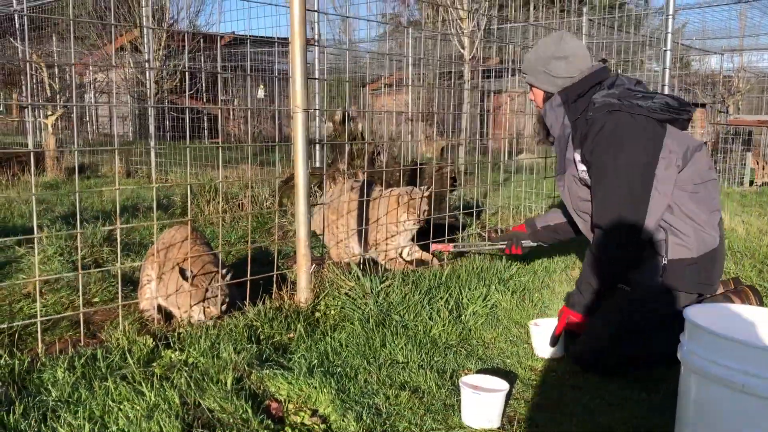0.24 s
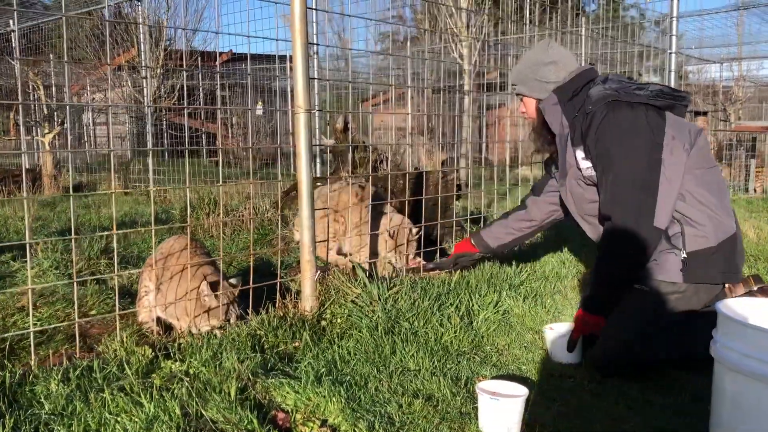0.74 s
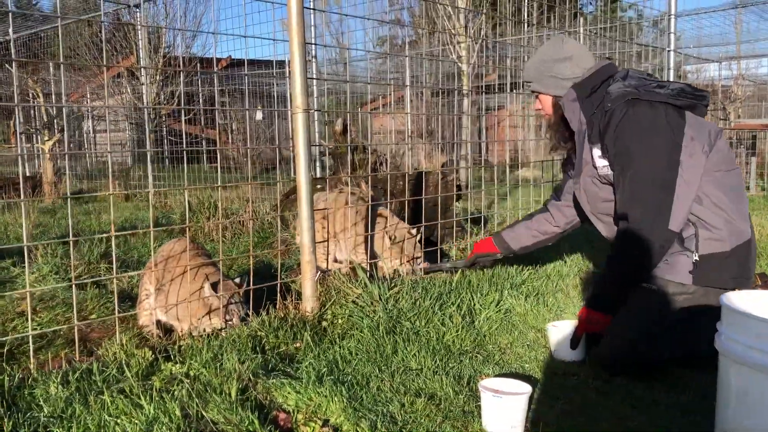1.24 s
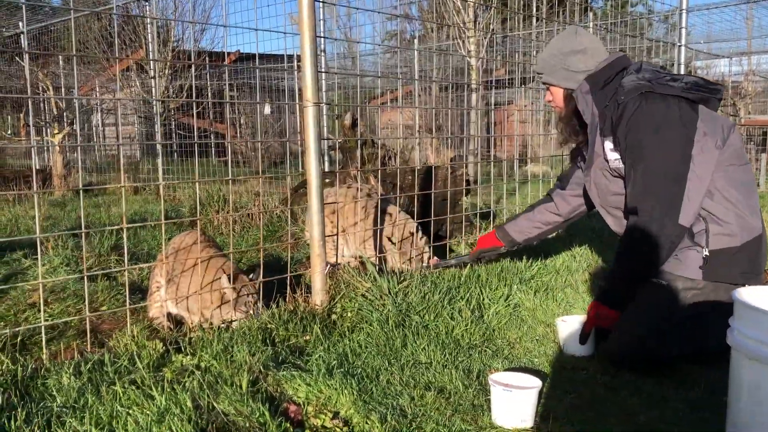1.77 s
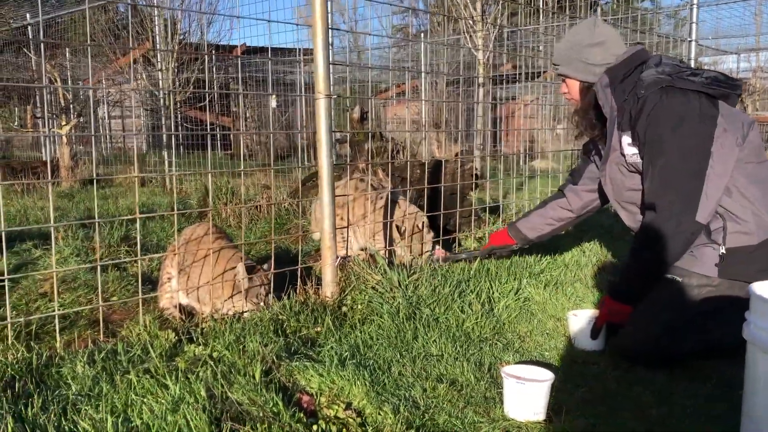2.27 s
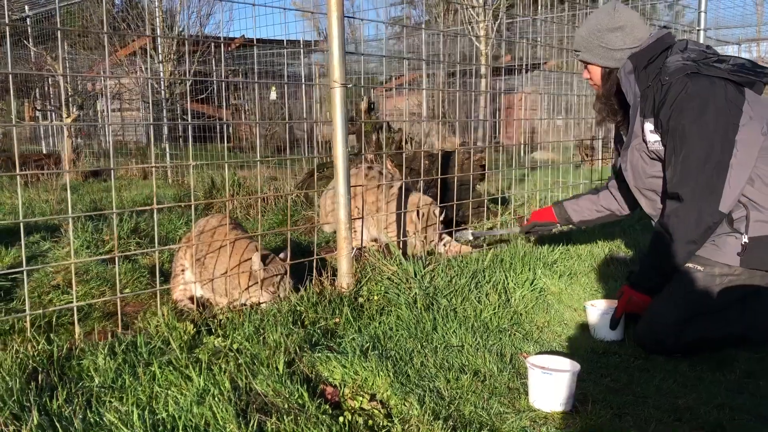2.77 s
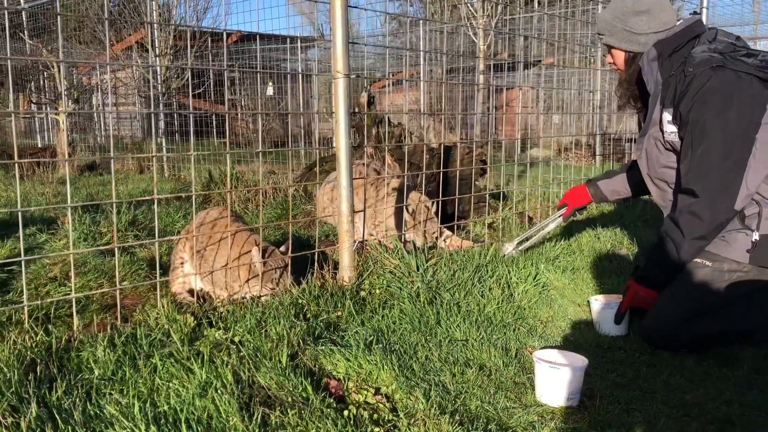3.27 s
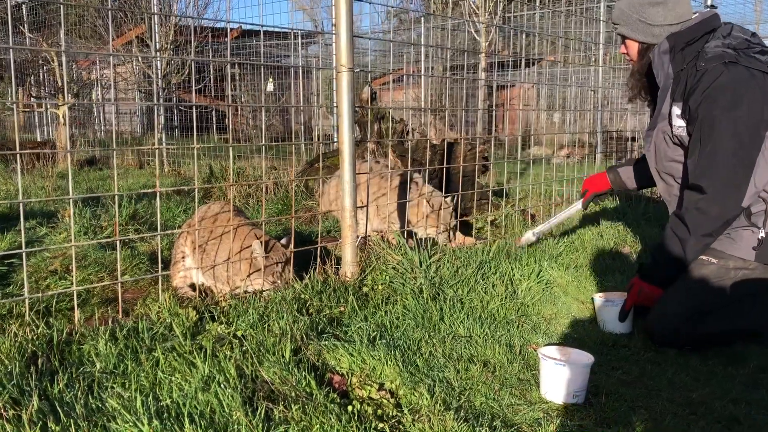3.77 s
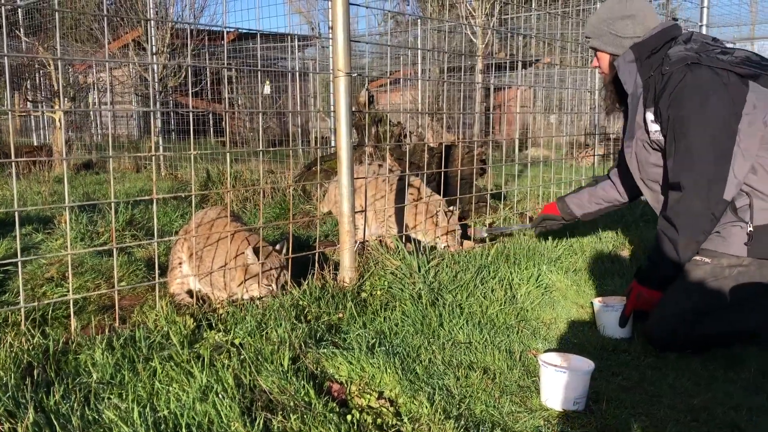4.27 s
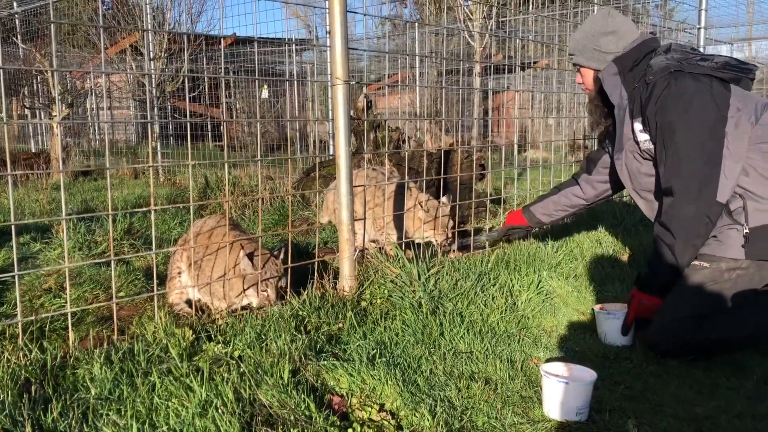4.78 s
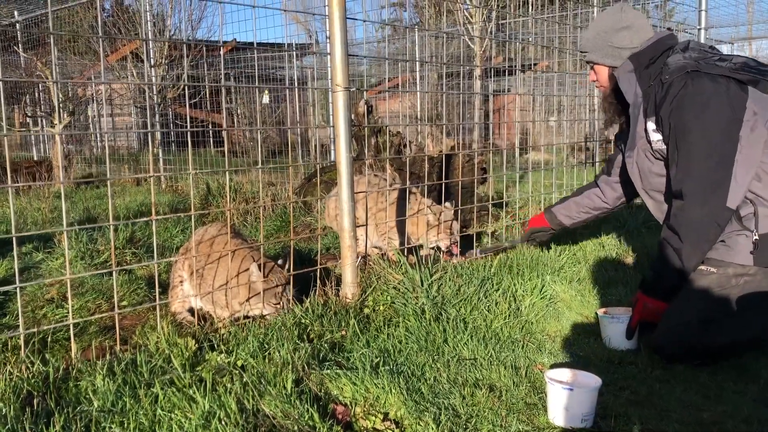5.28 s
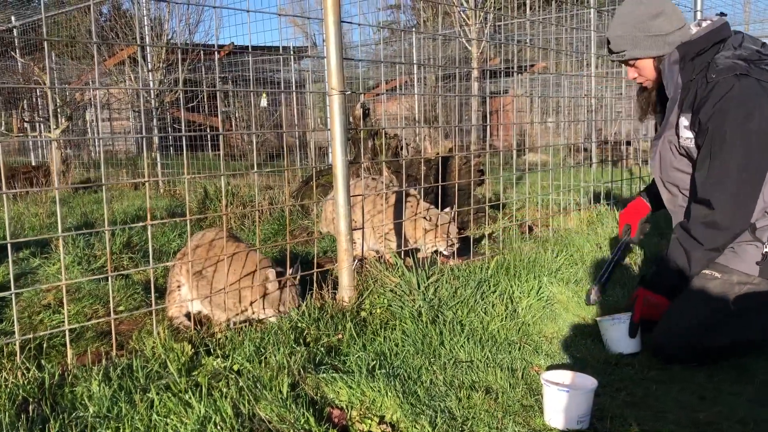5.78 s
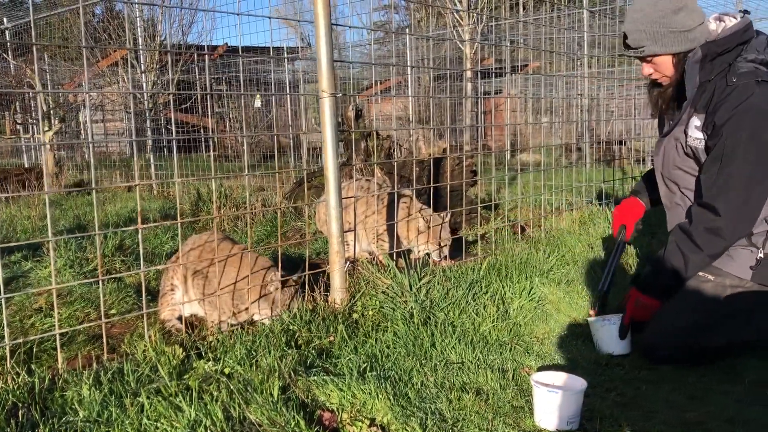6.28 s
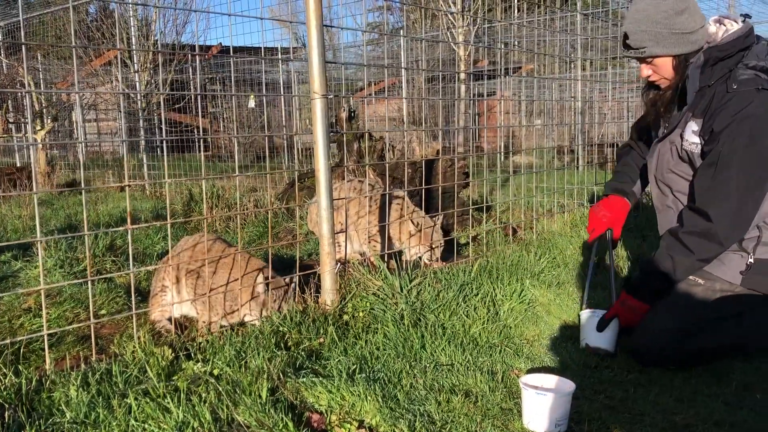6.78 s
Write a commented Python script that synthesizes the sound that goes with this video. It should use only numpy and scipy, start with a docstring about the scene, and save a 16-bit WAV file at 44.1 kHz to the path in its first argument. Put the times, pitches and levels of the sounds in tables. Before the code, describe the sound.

Feeding tongs snap shut in short, dry metallic clicks that grow louder, then strike wire mesh hard twice, the wires beating and fading for a second or two. Small dull knocks dot a quieter stretch. Another cluster of clacks ends in a weaker fence tap, then food and tongs tick and scrape in a tub. Open air, hardly any reverberation, soft low wind puffs on the microphone.

```python
"""Quiet lawn, wire fence: steel feeding tongs pass food through the mesh.
The jaws snap in dry clacks: coloured noise bursts plus damped arm modes and a tip note.
Strikes on the mesh add a shock tone, a decaying noise wash and groups of beating wire sines.
Around them: damped-mode knocks of food and tub, friction noise of sleeve and scratching tongs,
light wind as drifting noise with bass puffs, one far two-tone chirp."""
import sys
import numpy as np
from scipy import signal
from scipy.fft import rfft, irfft
from scipy.io import wavfile

SR = 44100
rng = np.random.default_rng(int(sys.argv[2]) if len(sys.argv) > 2 else 0)


def master(y):
    """Save y as 16-bit WAV."""
    cut = np.clip(np.atleast_2d(y).T, -1, 1)
    pcm = np.round(cut * 32767)  # scale
    wavfile.write(sys.argv[1], SR, pcm.astype(np.int16))


N = 309976
TIME_S = np.arange(N) / SR

# jaw closures: (time [s], nominal peak [dB], brightness [dB/octave],
# second tip re first [dB], rebound re first [dB])
SNAPS = [(0.6718, -30.5, 0.5, 5.5, -6), (1.1097, -33.5, 3, -6, -20), (1.1417, -27.5, 3, -16, -25),
         (1.2009, -25.5, 5.5, -22, -25), (1.5899, -16, 0.5, -20, -17), (1.7636, -16, -1.5, -7.5, -23),
         (1.977, -12.5, -2.5, -11.5, -21), (2.122, -36, -1.5, -13, -8), (2.154, -19, -4.5, -26, -18),
         (3.022, -33.5, -7, -27, -8), (4.849, -31, -2, 1, -21), (5.0487, -17, -2.5, 2, -7),
         (5.242, -9, -0.5, -8.5, -26), (5.3128, -37, -0.5, 4, -8)]
# tongs on mesh: (time [s], crack [dB], shock pitch [Hz], jaw clap [dB], mesh wash [dB],
# singing wires [dB], struck wire pitch [Hz])
STRIKES = [(0.967, -21, 7540, -39, -37.5, -43.5, 3450), (2.1545, -49, 3980, -45, -50, -60, 2300),
           (2.3261, -6.5, 5240, -16, -34.5, -35.5, 2460), (2.5208, -9.5, 5350, -11.5, -35.5, -47, 3980),
           (5.3328, -21.5, 7850, -22, -39, -51, 3820)]
# food and tongs on ground and tub: (time [s], nominal peak [dB], pitch [Hz], tick re knock [dB])
KNOCKS = [(0.381, -35.5, 1280, -12), (0.461, -33.5, 1630, -15), (0.482, -41, 3280, -16),
          (0.574, -40.5, 1220, -7), (2.849, -39.5, 1190, -13), (2.961, -38.5, 1500, -11),
          (3.344, -48, 8200, -20), (4.295, -33.5, 814, -5), (4.411, -45.5, 1400, -20),
          (4.56, -44.5, 2900, -12), (4.817, -40, 2400, -17), (6.04, -45.5, 1150, -18),
          (6.670, -35.5, 1400, -1.5), (6.706, -39.5, 1500, 0), (6.749, -37.5, 650, -5),
          (6.797, -42, 1400, -6)]
# dull bump as the reach begins, modes: (frequency [Hz], level [dB], t60 [s])
BUMP_MODES = [(4820, -0.83, 0.0091), (352, 0.84, 0.024), (213, 0.23, 0.025)]
# later hollow clop, modes: (frequency [Hz], level [dB], t60 [s])
CLOP_MODES = [(615, 1.5, 0.029), (1230, -6, 0.057), (3100, -20, 0.062)]
# tong strokes in the tub: (middle [s], Gaussian half length [s], level [dB])
STROKES = [(6.825, 0.026, -52.5), (6.856, 0.0054, -43), (6.881, 0.0085, -44.5), (6.963, 0.039, -45.5)]
# air puffs on the microphone: (time near peak [s], envelope peak [dB], pitch [Hz])
PUFFS = [(2.087, -40, 116), (3.501, -40, 55), (4.979, -39.5, 68.6), (6.046, -40.5, 63.5),
         (6.326, -39.5, 79), (6.746, -37, 101), (6.953, -37.5, 69)]
# tong arm modes: (frequency [Hz], relative level [dB], t60 [s])
ARM_MODES = [(646.3, -15, 0.077), (1500, -14.5, .02), (2080, -23.5, .018), (2090, -18.5, 0.035),
             (3354, -2, .025), (3630, -9, 0.071), (3810, -4.5, 0.031), (4630, -12, 0.018),
             (5460, 0.5, .032), (6350, 8.5, 0.011), (6750, -14, 0.0198), (7250, -5.5, .035),
             (7565, 2, 0.037), (8500, -15, .025), (13770, -25, 0.034)]
# groups of nearly equal wires: (frequency [Hz], spread [Hz], relative level [dB], t60 [s])
WIRE_GROUPS = [(2100, 85, -6.8, 3.2), (2170, 2, -23, .8), (2497, 1, -8.5, 1.2), (3130, 60, -6, .5),
               (3784, 1, -4.5, .95), (3830, 40, -7, .9), (4450, 130, -12, .65), (5550, 200, -9, 1.2),
               (8850, 170, -14, .6), (10750, 200, -13, .65), (14800, 550, -13.5, .45)]
# ring time of the whole mesh: (frequency [Hz], t60 [s])
MESH_DECAY = [(150, 6.7), (700, 2.11), (1500, 1.98), (3000, 1.4), (5500, 1.18), (9000, 0.8), (16000, 0.59)]
# mesh wash spectrum: (frequency [Hz], relative density [dB])
MESH_COLOUR = [(88, -33), (150, -4.5), (264, -5.5), (730, -3.5), (1080, -5), (1790, -6), (2360, -8.5),
               (2550, -5), (3490, -10), (3840, -4), (6140, -9), (10600, -10), (12400, -15), (14800, -18.5),
               (16000, -21)]
# jaw touch spectrum: (frequency [Hz], relative density [dB])
CLACK_COLOUR = [(240, -18), (400, -8.5), (655, -46), (949, -27), (1400, -7), (2430, -17), (2800, -3.5),
                (4580, 3.5), (5030, -1.5), (6440, 0), (8110, -0.5), (14100, -15), (16000, -27)]
# steel-on-wire crack spectrum: (frequency [Hz], relative density [dB])
CRACK_COLOUR = [(410, -50), (700, -25), (1560, -39.5), (1970, -8.5), (2770, -10.5), (4990, 2), (5690, -1.5),
                (6650, 1), (7990, -6), (8650, -12), (11800, -15), (14800, -14), (16000, -25.5)]
# scraping and tick spectrum: (frequency [Hz], relative density [dB])
SCRAPE_COLOUR = [(530, 3), (900, -1.5), (1920, -4.5), (2120, -4), (5040, 2), (6560, -8), (9200, -7),
                 (14900, -23), (16000, -21.5)]
# sleeve cloth spectrum: (frequency [Hz], relative density [dB])
CLOTH_COLOUR = [(180, -0.5), (300, 5), (462, -2.5), (537, -2), (1030, -7), (1510, -6), (1930, -8),
                (8790, -13.5), (16000, -23)]
# outdoor air spectrum: (frequency [Hz], relative density [dB])
AIR_COLOUR = [(15, -37), (25, -11), (70, -4), (157, -8.5), (217, -18.5), (263, -15.5), (344, -17.5),
              (476, -14), (545, -16), (695, -24), (1840, -31.5), (3080, -32), (4030, -34), (9320, -35),
              (16000, -42)]

# levels re touch at zero brightness; losses per dB/octave, as a touch turns glancing
RING_DB, RING_LOSS_DB = -8.5, 1
HOLLOW_DB, HOLLOW_LOSS_DB, HOLLOW_HZ = -9.5, 2, 1884  # note of the cupped tips
TIP_LAG_S = .0035
REBOUND_S, REBOUND_TILT_DB_PER_OCT = .015, -0.5
JAWS_TILT_DB_PER_OCT = 2
# brightness, dB/octave per dB of wire level over neutral
WIRE_BRIGHTENING, MESH_BRIGHTENING, WIRE_NEUTRAL_DB = 0.4, .08, -50.5
BUMP_S, BUMP_DB = 0.2753, -20.5
CLOP_S, CLOP_DB = 3.653, -24
KNOCK_T60_S, KNOCK_ROUGH = 0.028, 0.71
FAINT_TICKS, FAINT_TICK_DB, FAINT_TICK_HZ = 12, -55, 1600  # grass and chewing
REACH_PEAK_S, REACH_END_S, REACH_DB = 0.45, 1.0, -49.5
REACH_RISE_DB_PER_S, REACH_FALL_DB_PER_S = 17, 23
AIR_DB = -55
CUTOFF_HZ = 15850


def from_db(db):
    """Decibels to gain."""
    return 10 ** (np.asarray(db) / 20)


def rms_one(x):
    """Scale to unit power."""
    return x / np.sqrt(np.mean(x ** 2) + 1e-20)


def fade(t60_s, size):
    """Free decay, 60 dB down after t60."""
    return from_db(-60 * TIME_S[:size] / max(t60_s, 1e-4))


def add(out, start_s, sound):
    """Mix a sound in from start_s."""
    start = max(round(start_s * SR), 0)
    out[start:start + len(sound)] += sound[:N - start]


def log_hz(size):
    """log2 frequency of each bin."""
    return np.log2(np.maximum(np.fft.rfftfreq(size, 1 / SR), 1))


def noise(colour, size, tilt_db=0):
    """Random-phase noise of a given colour, tilted per octave above 1024 Hz; rms 1."""
    hz, db = np.transpose(colour)
    octave = log_hz(size)
    treble = np.maximum(octave - 10, 0)
    colour_db = np.interp(octave, np.log2(hz), db, right=-np.inf)
    gain = from_db(colour_db + tilt_db * treble)
    phase = 2 * np.pi * rng.random(len(octave))
    return rms_one(irfft(gain * np.exp(1j * phase), size))


def drift(rate_hz):
    """Normal random points at rate_hz joined by lines; the last of 4096 is held."""
    return np.interp(TIME_S * rate_hz, np.arange(4096), rng.standard_normal(4096))


def tongs():
    """The jaws clack tip after tip and rebound once, slightly duller."""
    out = np.zeros(N)
    for s, db, tilt_db, second_db, rebound_db in SNAPS:
        add(out, s, clack(db, tilt_db))
        add(out, s + TIP_LAG_S, clack(db + second_db, tilt_db))
        add(out, s + REBOUND_S, clack(db + rebound_db, tilt_db + REBOUND_TILT_DB_PER_OCT))
    return out


def clack(db, tilt_db):
    """Steel touches steel; the brighter and more glancing, the less the arms and tips ring."""
    touch = contact(CLACK_COLOUR, tilt_db, crack_t60_s=0.013, rattle_db=-7.5, rattle_t60_s=0.037)
    size = len(touch)
    hollow = np.sin(2 * np.pi * HOLLOW_HZ * TIME_S[:size]) * fade(0.012, size)
    hollow_db = HOLLOW_DB - HOLLOW_LOSS_DB * tilt_db
    ring_db = RING_DB - RING_LOSS_DB * max(tilt_db, 0)
    mix = touch + from_db(hollow_db) * hollow + from_db(ring_db) * arms(tilt_db)
    return from_db(db - 8.0) * mix


def contact(colour, tilt_db, crack_t60_s, rattle_db, rattle_t60_s, size=4096):
    """A hard touch: dense crack, then a weaker rattle while the surfaces settle."""
    grain = noise(colour, size, tilt_db)
    crack = fade(crack_t60_s, size)
    grain = grain / np.sqrt(np.average(grain ** 2, weights=crack ** 2))
    return grain * np.hypot(crack, from_db(rattle_db) * fade(rattle_t60_s, size))


def arms(tilt_db, scatter_db=0.0, size=4096):
    """A blow rings the damped arm modes with random polarity and, if set, level scatter."""
    hz, db, t60_s = np.transpose(ARM_MODES)
    level_db = db + tilt_db * np.log2(hz / 5000) + scatter_db * rng.standard_normal(len(hz))
    gains = from_db(level_db) * rng.choice([-1, 1], len(hz))
    out = np.zeros(size)
    for f, gain, decay_s in zip(hz, gains, t60_s):
        out += gain * np.sin(2 * np.pi * f * TIME_S[:size]) * fade(decay_s, size)
    return out


def fence(size=4096):
    """Steel on wire: shock, crack, arm ring, jaw clap and the long shiver of the mesh."""
    out = np.zeros(N)
    for s, crack_db, shock_hz, jaws_db, wash_db, wires_db, struck_hz in STRIKES:
        shock = from_db(5) * np.sin(2 * np.pi * shock_hz * TIME_S[:size]) * fade(.003, size)
        # a shorter contact rings higher and cracks brighter
        tilt_db = 5 * np.log2(shock_hz / 5000)
        crack = contact(CRACK_COLOUR, tilt_db, crack_t60_s=0.012, rattle_db=-13, rattle_t60_s=0.041)
        hit = small_source(shock + from_db(1) * crack)
        add(out, s, from_db(crack_db) * (hit + from_db(-21.5) * arms(tilt_db)))
        # the jolt claps the jaws together
        add(out, s + TIP_LAG_S, clack(jaws_db, JAWS_TILT_DB_PER_OCT))
        # harder-hit wires sing brighter; the wash follows less
        hardness_db = wires_db - WIRE_NEUTRAL_DB
        add(out, s, from_db(wash_db) * mesh(MESH_BRIGHTENING * hardness_db))
        add(out, s, from_db(wires_db) * wires(struck_hz, WIRE_BRIGHTENING * hardness_db))
    return out


def small_source(x):
    """A thin contact radiates little bass."""
    return signal.sosfilt(signal.butter(2, 1500, "high", fs=SR, output="sos"), x)


def mesh(tilt_db, uneven_db=5.0, spacing_hz=14, size=98304):
    """Countless modes of uneven strength merge into a wash whose highs die first."""
    hz, t60_s = np.transpose(MESH_DECAY)
    octave = log_hz(size)
    uneven = np.clip(rng.standard_normal(4096), -2, 2)
    strength = from_db(uneven_db * np.interp(2 ** octave / spacing_hz, np.arange(4096), uneven))
    wash = rfft(noise(MESH_COLOUR, size, tilt_db)) * rms_one(strength)
    out = np.zeros(size)
    # overlapping bands, one per decay time
    for share, decay_s in zip(np.eye(len(hz)), t60_s):
        band = irfft(wash * np.interp(octave, np.log2(hz), share))
        out += band * fade(decay_s, size)
    # the first rush drains away along the fence faster than the rest
    return out * (0.58 + 0.41 * fade(0.49, size))


def wires(struck_hz, tilt_db, favour_db=6, reach_oct=0.253, count=20, size=110000):
    """Near-equal wires start together, then beat; those near the struck pitch gain level."""
    out = np.zeros(size)
    for hz, spread_hz, db, t60_s in WIRE_GROUPS:
        length = min(int(t60_s * SR), size)
        pitches_hz = hz + spread_hz * rng.standard_normal((count, 1))
        phases = (2 * np.pi * pitches_hz * TIME_S[:length]).astype(np.float32)
        group = np.sin(phases).sum(axis=0) / np.sqrt(count)
        near = np.exp(-(np.log2(hz / struck_hz) / reach_oct) ** 2)
        gain = from_db(db + favour_db * near + tilt_db * np.log2(hz / 4000))
        # a tight group stays in step, so each wire needs a smaller share
        share = 1 / (1 + 3 / abs(spread_hz))
        out[:length] += gain * share * group * fade(t60_s, length)
    return out


def knocks():
    """Bump, clop, small knocks of food and tub, and randomly timed faint ticks."""
    out = np.zeros(N)
    add(out, BUMP_S, from_db(BUMP_DB) * knock(BUMP_MODES, tick_db=-9.5, rough=0.37))
    add(out, CLOP_S, from_db(CLOP_DB) * knock(CLOP_MODES, tick_db=-25, rough=0.23))
    for s, db, hz, tick_db in KNOCKS:
        add(out, s, from_db(db) * knock([(hz, 0, KNOCK_T60_S)], tick_db, KNOCK_ROUGH))
    for when, octaves in rng.random((FAINT_TICKS, 2)):
        mode = FAINT_TICK_HZ * 2 ** (2 * octaves - 1), 0, KNOCK_T60_S
        tick = knock([mode], tick_db=-10, rough=KNOCK_ROUGH)
        add(out, when * TIME_S[-1], from_db(FAINT_TICK_DB) * tick)
    return out


def knock(modes, tick_db, rough, size=4096):
    """A soft hit: a tick plus rough damped modes, each with a weaker partial at 1.2 times."""
    tick = contact(SCRAPE_COLOUR, 0, crack_t60_s=0.0118, rattle_db=-14, rattle_t60_s=0.093)
    out = from_db(tick_db) * tick
    for hz, db, t60_s in modes:
        cycles = hz * TIME_S[:size]
        crunch = noise([(hz / 4, -16), (hz, 0), (hz * 4, -32)], size)
        tone = np.sin(2 * np.pi * cycles) + .2 * np.sin(2 * np.pi * 1.2 * cycles)
        body = (1 - rough) * tone + rough * crunch
        # a soft contact takes half a cycle to build up
        attack = np.minimum(2 * cycles, 1)
        out = out + from_db(db) * body * attack * fade(t60_s, size)
    return out


def rustle():
    """The sleeve hisses on the reach; later the tongs scratch in the tub, stroke by stroke."""
    since_s = TIME_S - REACH_PEAK_S
    swell_db = np.minimum(REACH_RISE_DB_PER_S * since_s, -REACH_FALL_DB_PER_S * since_s)
    reach = from_db(REACH_DB + swell_db) * np.clip((REACH_END_S - TIME_S) / 0.041, 0, 1)
    digging = np.zeros(N)
    for s, half_s, db in STROKES:
        digging += from_db(db) * np.exp(-((TIME_S - s) / half_s) ** 2 / 2)
    sleeve = reach * rubbing(CLOTH_COLOUR, clump_db=2.3, clump_hz=320)
    return sleeve + digging * rubbing(SCRAPE_COLOUR, clump_db=6.0, clump_hz=600)


def rubbing(colour, clump_db, clump_hz):
    """Friction noise, its level drifting at random on a fast and a slow scale."""
    wander = drift(clump_hz) + .5 * drift(clump_hz / 10)
    clumps = rms_one(from_db(clump_db * np.clip(wander, -2.5, 2.5)))
    return clumps * noise(colour, N)


def bird(start_s=6.275, length_s=0.057, tone_db=-61):
    """One far chirp: two thin tones whose pitch arches slightly and ends lower."""
    along = np.clip((TIME_S - start_s) / length_s, 0, 1)
    arch = np.sin(np.pi * along)
    warped_s = np.cumsum(1 + 0.037 * arch - 0.041 * along) / SR
    tones = np.sin(2 * np.pi * 3080 * warped_s) + np.sin(2 * np.pi * 3780 * warped_s)
    return from_db(tone_db) * arch * tones


def outdoors(puff_s=0.0047, size=8192):
    """Distant hush; its bass swells with the breeze, and puffs bump the microphone."""
    air = from_db(AIR_DB) * noise(AIR_COLOUR, N)
    bass = signal.sosfiltfilt(signal.butter(2, 170, fs=SR, output="sos"), air)
    gusts_db = 2.2 * drift(22) - 2.5
    out = air + bass * (from_db(gusts_db) - 1)
    age = TIME_S[:size] / puff_s
    for s, db, hz in PUFFS:
        sway = np.sin(2 * np.pi * (hz * TIME_S[:size] + rng.random()))
        add(out, s - .004, from_db(db) * sway * age * np.exp(1 - age))
    return out


def scene():
    """All sources summed at one microphone in the open."""
    return (tongs() + fence() + knocks() + rustle() + bird() + outdoors())[None]


def record(dry):
    """The microphone sheds the deepest bass, clips at full scale, and the top is cut."""
    thin = signal.sosfilt(signal.butter(4, 35, "high", fs=SR, output="sos"), dry)
    lowpass = signal.ellip(10, .1, 80, CUTOFF_HZ, fs=SR, output="sos")
    return signal.sosfilt(lowpass, np.clip(thin, -1, 1))


dry = scene()
out = record(dry)
master(out)
```